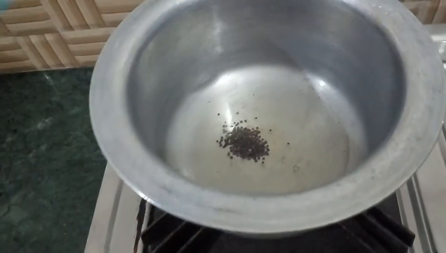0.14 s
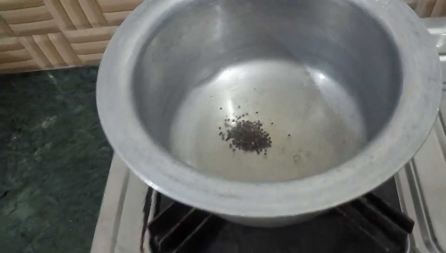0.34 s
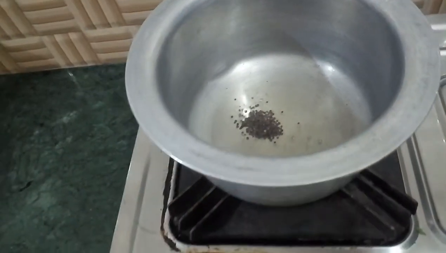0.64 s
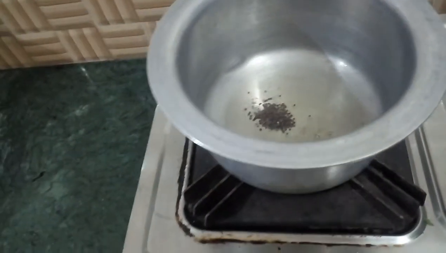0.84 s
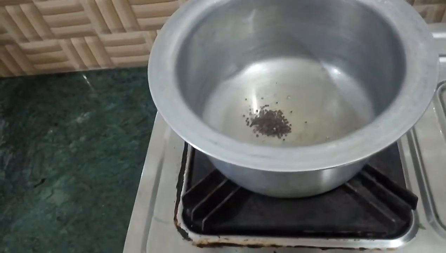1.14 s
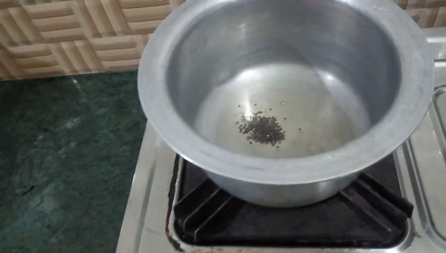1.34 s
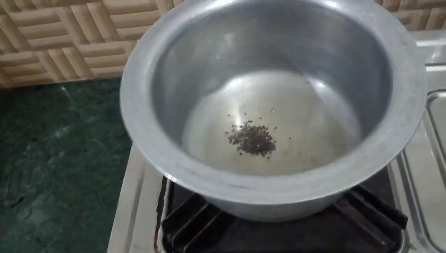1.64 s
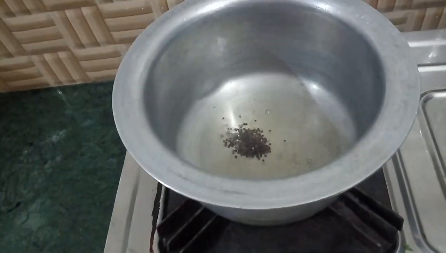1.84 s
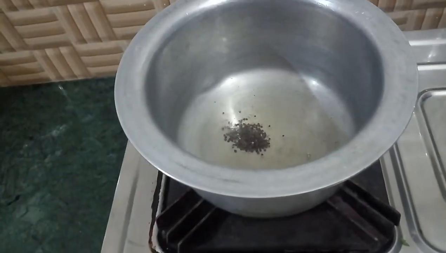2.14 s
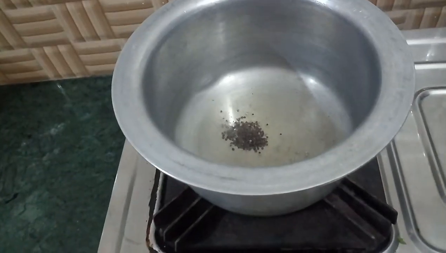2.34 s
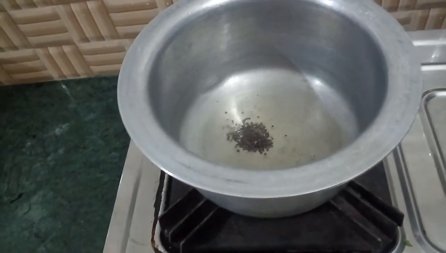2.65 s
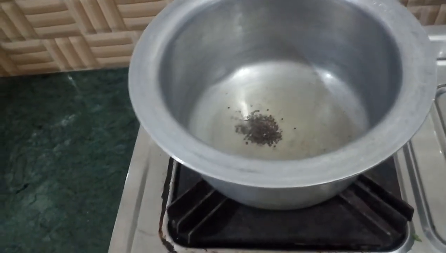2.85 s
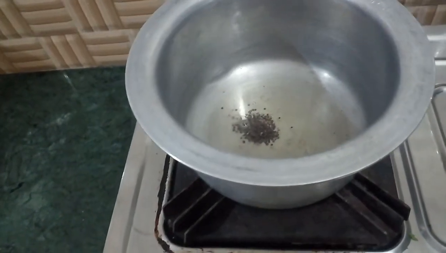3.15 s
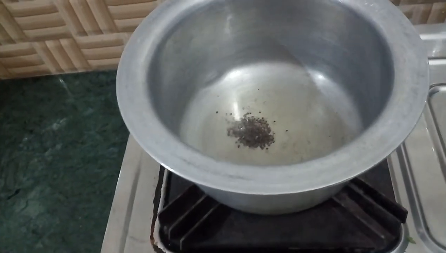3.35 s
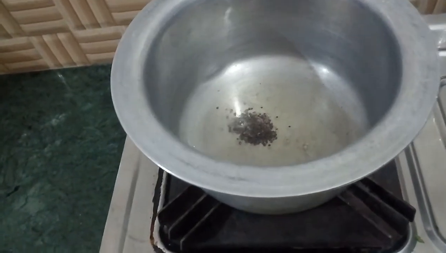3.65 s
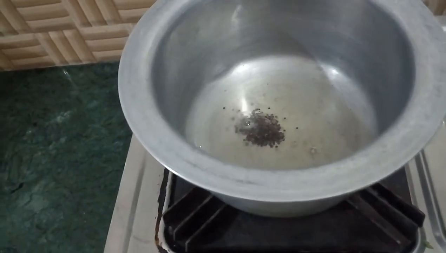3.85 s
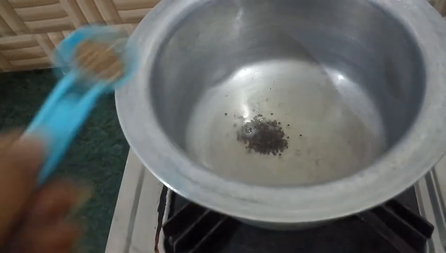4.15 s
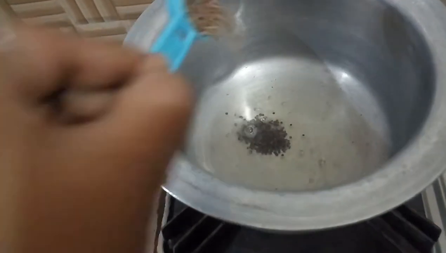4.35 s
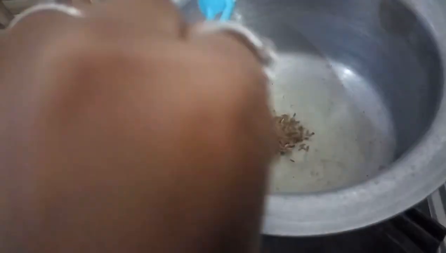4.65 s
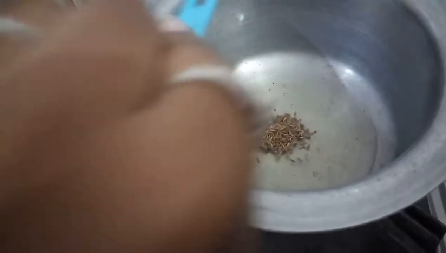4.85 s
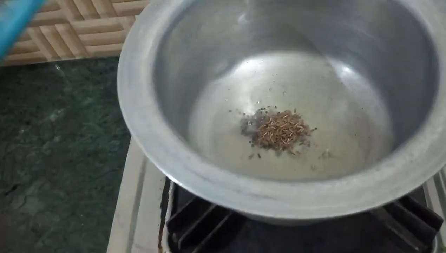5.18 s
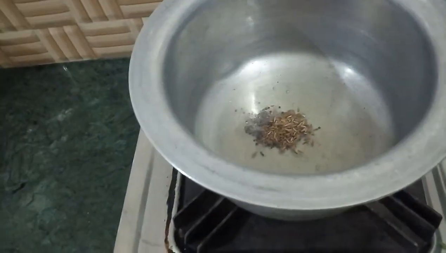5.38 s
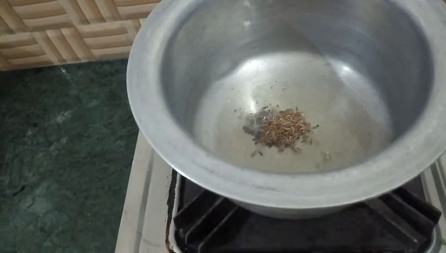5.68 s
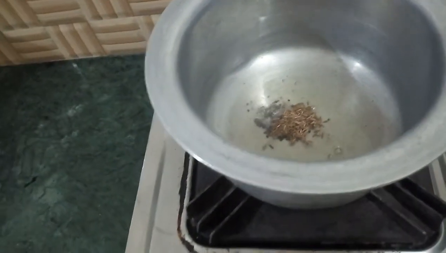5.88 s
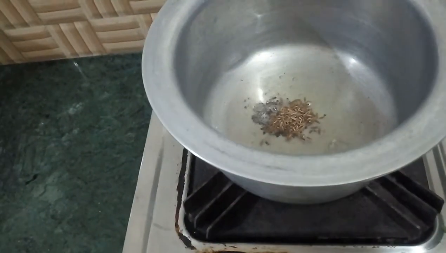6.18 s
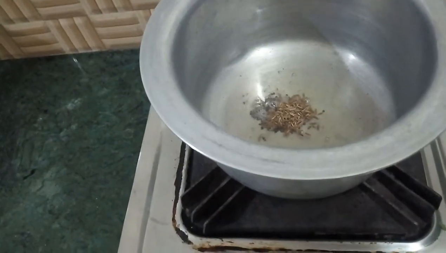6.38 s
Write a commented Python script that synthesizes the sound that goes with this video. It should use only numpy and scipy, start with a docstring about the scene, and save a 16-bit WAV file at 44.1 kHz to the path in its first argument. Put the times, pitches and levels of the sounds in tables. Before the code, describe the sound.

Seeds frying in hot oil crackle with dense, pitched little pops and a fine fizz inside a ringing metal pot, over a quiet gas burner murmur.

```python
"""Mustard and cumin seeds fry in hot oil in an aluminium pot on a gas ring, heard from just above the rim.
At first short pitched pops of bursting steam bubbles come thick and fast over a fizz of tiny ones.
They thin out after a second, crowd in again past the middle as the fizz peaks, then thin out to the end.
Now and then a husk snaps: a single click. Echoes and decaying tones ring the pot and a small hard kitchen.
Shaped noise makes the steady burner murmur underneath and two soft bumps of the hand."""
import sys
import numpy as np
from scipy import signal
from scipy.fft import rfft, irfft
from scipy.io import wavfile

SR = 44100
rng = np.random.default_rng(int(sys.argv[2]) if len(sys.argv) > 2 else 0)


def bounce(signal):
    """Save signal as a 16-bit WAV file at the path given by the first command-line argument."""
    frames = np.transpose(np.atleast_2d(signal))
    limited = np.clip(frames, -1, 1)
    pcm = np.round(limited * 32767).astype(np.int16)
    wavfile.write(sys.argv[1], SR, pcm)


N = 287443  # length in samples

# The loudest steam bubbles bursting. Each row: start in seconds, pitch in Hz, strength in dB.
LOUD_POPS = [(0.028, 3560, -7), (0.141, 1840, -7), (0.166, 5980, -5), (0.18, 3230, -7), (0.27, 2620, -5),
             (0.285, 2790, -5), (0.362, 3370, -3), (0.428, 1750, -7), (0.566, 3450, -1), (0.628, 2640, -9),
             (0.647, 3210, -2), (0.742, 4460, -7), (0.766, 3300, -2), (0.832, 2470, -4), (0.984, 3260, -4),
             (1.009, 2580, -6), (1.108, 2600, -5), (1.134, 4800, -7), (1.258, 2570, -9), (1.316, 2650, -7),
             (1.448, 3350, -12), (1.48, 1960, -9), (1.527, 2530, -13), (1.64, 2650, -9), (1.699, 2540, -2),
             (1.798, 4200, -7), (1.863, 2560, -2), (1.998, 2550, -11), (2.02, 2570, -11), (2.099, 1760, -4),
             (2.224, 4610, -8), (2.318, 3320, -9), (2.397, 2570, -4), (2.411, 3310, -9), (2.476, 3300, -5),
             (2.54, 3130, -9), (2.586, 3530, -8), (2.597, 1640, -3), (2.715, 2420, -8), (2.75, 4040, -7),
             (2.88, 2630, -8), (3.021, 3200, -7), (3.059, 2490, -9), (3.197, 2370, -7), (3.316, 1800, -5),
             (3.337, 2580, -5), (3.44, 3200, -3), (3.503, 3950, -4), (3.574, 2480, -2), (3.645, 4020, -4),
             (3.706, 3590, -7), (3.757, 4490, -7), (3.819, 2430, -5), (3.861, 3270, -3), (3.921, 3100, -7),
             (3.975, 2420, -2), (4.056, 3320, -4), (4.105, 5950, -8), (4.155, 3250, -4), (4.178, 3990, -4),
             (4.275, 4060, -5), (4.32, 1820, -8), (4.339, 4030, -5), (4.354, 3730, -6), (4.365, 3300, -4),
             (4.413, 4110, -3), (4.42, 3990, -6), (4.506, 4220, -7), (4.535, 4030, -5), (4.567, 4140, -5),
             (4.663, 4400, -7), (4.76, 2440, -3), (4.787, 2590, -6), (4.871, 3390, -3), (5.046, 2410, -3),
             (5.088, 3250, -5), (5.202, 2250, -5), (5.349, 2570, -3), (5.429, 1590, -9), (5.447, 2550, -7),
             (5.59, 4700, -11), (5.615, 4560, -10), (5.74, 1800, -10), (5.779, 2450, -6),
             (5.966, 2580, -10), (6.009, 3100, -7), (6.076, 4090, -6), (6.15, 1750, -3), (6.247, 2420, -11),
             (6.39, 2540, -5)]
# Colour of a burst as it leaves the pot. Each row: frequency in Hz, relative level in dB.
BURST_COLOUR = [(60, -50), (300, -28), (500, -34), (680, -1), (980, -34.5), (1550, 4), (2100, -2.5),
                (2500, 9.5), (3300, 3.5), (5000, -10.5), (6200, -8), (8000, -25.5), (11000, -28.5),
                (16000, -39.5)]
# Pitches that the pot favours in a pop, in Hz.
FAVOURED_HZ = [2508, 3412, 4153, 4420, 5694]


def undb(db):
    """Turn decibels into gain."""
    return 10 ** (np.asarray(db) / 20)


def unit(x):
    """Scale to an rms (average strength) of 1."""
    return x / np.sqrt(np.mean(x ** 2))


def add(track, s, sound):
    """Mix a sound into a track at a time in seconds."""
    i = int(np.clip(s * SR, 0, N - 1))
    track[i:i + len(sound)] += sound[:N - i]


def convolve(x, impulse):
    """Pass a sound through an impulse response."""
    return signal.fftconvolve(x, impulse)[:N]


def response(points, size=2048):
    """Make an impulse response that starts at once and has the colour given by (Hz, dB) points."""
    hz, db = np.transpose(points)
    bins = np.maximum(np.fft.rfftfreq(size, 1 / SR), 1)
    gain = undb(np.interp(np.log(bins), np.log(hz), db))
    # folding the cepstrum packs the energy as early as possible
    cepstrum = irfft(np.log(gain))
    cepstrum[1:size // 2] *= 2
    cepstrum[size // 2 + 1:] = 0
    return irfft(np.exp(rfft(cepstrum)))


def high_pass(x, hz):
    """Take away the bass below a frequency."""
    return signal.sosfilt(signal.butter(2, hz, "high", fs=SR, output="sos"), x)


def leak(x, settle_s):
    """Let every kick die away exponentially."""
    return signal.lfilter([1], [1, -np.exp(-1 / (settle_s * SR))], x)


def diffuse(x, t60_s, first_s, count=24):
    """A dense tail of echoes, whose pattern changes slice by slice as the hand-held microphone drifts."""
    t = np.arange(SR // 2) / SR
    hop = N // count + 1
    out = np.zeros(N)
    for start in range(0, N, hop):
        tail = rng.standard_normal(len(t)) * undb(-60 * t / t60_s) * (t > first_s)
        echoes = signal.fftconvolve(x[start:start + hop], tail / np.linalg.norm(tail))
        add(out, start / SR, echoes)
    return out


def burner():
    """The gas flame's low steady murmur: noise of a fixed colour."""
    # Each row: frequency in Hz, relative level in dB per Hz.
    flame_colour = [(20, -14.5), (38, -3), (50, 3), (65, -14), (105, -2), (220, -14), (380, -5.5),
                    (700, -11), (2000, 5.5), (8000, -26), (16000, -49)]
    murmur = convolve(rng.standard_normal(N), response(flame_colour, size=8192))
    return undb(-52.5) * unit(murmur)


def handling(width_s=0.055, low_hz=90, high_hz=220):
    """Low noise swells dully as the grip of the hand holding the microphone shifts."""
    # Each row: middle of the bump in seconds, level in dB.
    bumps = [(2.0, -59.5), (4.3, -59)]
    t = np.arange(N) / SR
    band = signal.butter(2, [low_hz, high_hz], "band", fs=SR, output="sos")
    rumble = signal.sosfilt(band, rng.standard_normal(N))
    swells = sum(undb(db) * np.exp(-((t - s) / width_s) ** 2) for s, db in bumps)
    return unit(rumble) * swells


def bubble(hz, length_s, rise, glide, shape):
    """A steam cavity rings up, drifts in pitch and dies away, with the energy of a unit sine length_s long."""
    age = np.arange(int(4 * length_s * SR) + 8) / (length_s * SR)  # in lengths
    ring_up = 1 - np.exp(-(age / rise) ** 2)
    die_away = np.exp(-(age / 1.3) ** shape)
    fade_out = np.minimum(abs(4 - age), 1)
    envelope = ring_up * die_away * fade_out
    envelope *= np.sqrt(length_s * SR / np.sum(envelope ** 2))
    pitch_hz = hz * (1 + glide * np.tanh(age - .5))
    return envelope * np.sin(2 * np.pi * np.cumsum(pitch_hz) / SR)


def small_bubbles(per_s=160, spread_db=5, low_hz=2600, high_hz=7200, cycles=3):
    """A swarm of small pitched bubbles of all sizes, bursting at random."""
    track = np.zeros(N)
    for when, width, strength, damping in rng.random((int(per_s * N / SR), 4)):
        hz = low_hz * (high_hz / low_hz) ** width
        gain = undb(-spread_db * np.log(strength + 0.025))
        length_s = cycles * np.exp(2 * damping - 1) / hz
        add(track, when * N / SR, gain * bubble(hz, length_s, rise=0.15, glide=0, shape=0.35))
    return unit(track)


def spits(per_s=300, spread_db=14.0, decay_s=0.0013):
    """Droplets of moisture flash to steam, each a tiny unpitched crack of noise."""
    when, strength = rng.random((int(per_s * N / SR), 2)).T
    gains = undb(-spread_db * np.log(strength + 0.02))
    kicks = np.bincount((when * N).astype(int), gains, N)
    return unit(leak(kicks, decay_s) * rng.standard_normal(N))


def stirred(settle_s, db_per_octave, big_hz=2000):
    """How far the loud pops stir the oil: each kicks it by its strength and size, then it settles."""
    s, hz, db = np.transpose(LOUD_POPS)
    power = undb(db + db_per_octave * np.log2(hz / big_hz)) ** 2
    kicks = np.bincount((s * SR).astype(int), power, N)
    return np.sqrt(leak(kicks, settle_s))


def fizz_db(s):
    """How hard the oil fizzes at a time, before the flares after loud pops."""
    # Each row: time in seconds, relative level in dB.
    fizz_levels = [(0.0, -26), (0.4, -33), (1.1, -30), (1.37, -40), (1.45, -32), (2.15, -33), (2.2, -28),
                   (2.87, -29), (2.95, -37), (3.02, -28), (3.87, -26), (3.95, -33), (4.42, -19), (4.9, -33),
                   (4.92, -40), (5.15, -26), (5.37, -40), (5.6, -26), (5.72, -42), (5.8, -32), (5.87, -40),
                   (6.07, -28), (6.17, -35), (6.52, -35)]
    return np.interp(s, *np.transpose(fizz_levels))


def fizz(bubbles_db=1.5, spits_db=-3, hiss_db=-6, calm_db=-1.0, stir_db=1):
    """Bubbles, spits and finer hiss surge as the seeds give up their water, and flare after loud pops."""
    # Each row: frequency in Hz, relative level in dB.
    fizz_colour = [(150, -26), (450, -34.5), (680, -4), (1000, -23), (1550, 1.5), (2150, -12), (2480, 10.5),
                   (2900, -11), (3280, 1), (5100, -4), (6400, -2.5), (7900, -21), (9300, -13), (12500, -35),
                   (15300, -33)]
    swarm = undb(bubbles_db) * small_bubbles()
    swarm += undb(spits_db) * spits()
    swarm += undb(hiss_db) * spits(per_s=2000, spread_db=10.0, decay_s=0.0012)
    stirring = stirred(settle_s=0.013, db_per_octave=-19.0)
    flare = np.hypot(undb(calm_db), undb(stir_db) * stirring)
    surge = undb(fizz_db(np.arange(N) / SR))
    return convolve(swarm, response(fizz_colour)) * surge * flare


def gurgle(gain_db=-38):
    """The oil burbles low for a moment after a loud pop, most of all where a big bubble has burst."""
    # Each row: frequency in Hz, relative level in dB.
    gurgle_colour = [(100, -34), (250, -19.5), (380, -14), (690, 1), (1000, -11.5), (1600, -3),
                     (2400, -4.5), (5000, -34.5)]
    burps = spits(per_s=120, spread_db=6.5, decay_s=.0012)
    burble = unit(convolve(burps, response(gurgle_colour)))
    return undb(gain_db) * burble * stirred(settle_s=0.066, db_per_octave=-17)


def snaps():
    """Dry husks split, each with a single sharp click."""
    # Each row: start in seconds, peak in dB before the pot and kitchen.
    snap_times = [(0.1731, -8.5), (0.6302, -18), (0.649, -31), (1.0306, -5.5), (1.5286, -9), (3.8093, -9),
                  (4.182, -14), (5.214, -13), (6.395, -11.5)]
    # Each row: frequency in Hz, relative level in dB.
    snap_colour = [(200, -39), (1200, -23), (3000, 4.5), (6000, 4.5), (8000, -7), (11000, -6), (16000, -16)]
    track, click = np.zeros(N), response(snap_colour)
    for s, db in snap_times:
        add(track, s, undb(db) * click / abs(click).max())
    return track


def lesser_pops(count=80, base_db=-13, usual_fizz_db=-31, follow=0.4, spread_db=2, detune=0.025):
    """Smaller bubbles burst at random, harder while the oil fizzes hard; rows like LOUD_POPS."""
    rows = []
    for k, (when, which, tuning, strength) in enumerate(rng.random((count, 4))):
        s = (k + when) / count * N / SR
        hz = FAVOURED_HZ[int(which * len(FAVOURED_HZ))] * (1 + detune * (2 * tuning - 1))
        surge_db = follow * (fizz_db(s) - usual_fizz_db)
        rows.append((s, hz, base_db + surge_db + spread_db * (2 * strength - 1)))
    return rows


def daughter_pops(within_s=0.14, below_db=-12, smaller=1.12, detune=0.22, count=3, big_below_hz=2300):
    """A big low bubble breaks into a few, mostly smaller, that burst soon after; rows like LOUD_POPS."""
    rows = []
    for s, hz, db in LOUD_POPS:
        if hz < big_below_hz:
            for k, (when, tuning) in enumerate(rng.random((count, 2))):
                later_s = s + within_s * (k + when) / count
                daughter_hz = hz * smaller * (1 + detune * (2 * tuning - 1))
                rows.append((later_s, daughter_hz, db + below_db))
    return rows


def splutter(bursts, after_s=0.038, below_db=-15, big_hz=2000, db_per_octave=-9, fade_db_per_s=-45,
             tear_s=0.0042, scatter_db=10, count=7):
    """After a pop the shaken oil film tears again and again; big low bubbles leave the most spray."""
    track = np.zeros(N)
    t = np.arange(SR // 100) / SR
    for s, hz, db in bursts:
        spray_db = db + below_db + db_per_octave * np.log2(hz / big_hz)
        # each tear is coloured by the size of its parent bubble
        band = signal.butter(1, [hz / 3, hz * 1.2], "band", fs=SR)
        for wait, strength in rng.random((count, 2)):
            delay_s = .005 - after_s * np.log(wait + 1e-9)
            gain = undb(spray_db + fade_db_per_s * delay_s + scatter_db * (strength - 1.5))
            tear = signal.lfilter(*band, rng.standard_normal(len(t)))
            add(track, s + delay_s, gain * unit(tear) * np.exp(-t / tear_s))
    return convolve(track, response(BURST_COLOUR))


def side_rings(bursts, below_db=-9, db_per_octave=-10, scatter_db=3, detune=0.066):
    """A pop also sets the pot's other favoured pitches ringing for a moment, the nearest ones most."""
    track = np.zeros(N)
    for s, hz, db in bursts:
        for ring_hz in FAVOURED_HZ:
            strength, tuning, push = 2 * rng.random(3) - 1
            octaves = abs(np.log2(ring_hz / hz))
            if octaves > .12:  # leave out the pop's own pitch
                ring = bubble(ring_hz * (1 + detune * tuning), length_s=.0013, rise=.35, glide=0, shape=1)
                gain = undb(db + below_db + db_per_octave * octaves + scatter_db * strength)
                add(track, s, np.sign(push) * gain * ring)
    return track


def pops(bursts, tone_db=-2.0, splash_db=-10, big_hz=2500, db_per_octave=-1, rise=0.29, splash_s=0.005,
         glide_spread=0.032, low_cut_hz=700, length_spread=0.39):
    """Bubbles ring at a pitch, with a brief splash as the oil film tears, fuller for big ones."""
    # How long a bubble usually rings. Each row: pitch in Hz, length in seconds.
    ring_lengths = [(1750, 0.0023), (2500, 0.0029), (3300, 0.0029), (4000, 0.0014), (6000, 0.00087)]
    tones, splashes = np.zeros(N), np.zeros(N)
    t = np.arange(SR // 50) / SR
    for s, hz, db in bursts:
        glide, sudden = glide_spread * rng.standard_normal(), .5 + rng.random()
        usual_s = np.interp(hz, *np.transpose(ring_lengths))
        length_s = usual_s * np.exp(length_spread * (2 * rng.random() - 1))
        tone = bubble(hz, length_s, rise * sudden, glide, shape=1.15)
        add(tones, s, undb(db + tone_db) * tone)
        splash = high_pass(np.exp(-t / splash_s) * rng.standard_normal(len(t)), hz / 4)
        size_db = db_per_octave * np.log2(hz / big_hz)
        add(splashes, s, undb(db + splash_db + size_db) * splash)
    # so small a source radiates almost no bass
    return high_pass(tones, low_cut_hz) + convolve(splashes, response(BURST_COLOUR))


def pot(x, metal_db=-58.5, air_db=-7.0, air_t60_s=0.12, first_s=0.0026):
    """The air in the pot reverberates in a few bands while the aluminium rings thinly."""
    # Ringing of the metal. Each row: frequency in Hz, relative level in dB, time to fall 60 dB in seconds.
    metal_modes = [(691.6, -8.5, 0.16), (789.5, 1.5, 0.38), (1364, -4.5, 0.6), (1425, 2, 0.25),
                   (1580, 5, 0.14), (1873, 1, 0.23), (2439, -6.5, 0.34), (3253, -6, 0.1), (3950, -21, 0.11),
                   (4470, -20, 0.22), (5460, -5, 0.15)]
    # Crowded resonances of the air. Each row: frequency in Hz, width in Hz, relative level in dB.
    air_bands = [(666, 72, -11), (1484, 180, 7), (1882, 115, 9.5), (2485, 340, 2.5), (3270, 79, 6),
                 (4280, 1200, -3), (5900, 4200, 0.5)]
    t = np.arange(SR // 2) / SR
    metal = sum(undb(metal_db + db - 60 * t / t60) * np.cos(2 * np.pi * hz * t)
                for hz, db, t60 in metal_modes)
    bounces = diffuse(x, air_t60_s, first_s)
    air = sum(undb(air_db + db) * signal.lfilter(*signal.iirpeak(hz, hz / width, fs=SR), bounces)
              for hz, width, db in air_bands)
    return x + convolve(x, metal) + air


def kitchen(x, wet_db=-17, t60_s=0.6, first_s=.006):
    """Tiles and stone return a short diffuse tail."""
    return x + undb(wet_db) * diffuse(x, t60_s, first_s)


def scene():
    """Everything that fries sounds through the pot and the kitchen; burner and bumps are added plain."""
    bursts = list(LOUD_POPS) + lesser_pops() + daughter_pops()
    frying = pops(bursts) + side_rings(bursts) + splutter(bursts) + fizz() + gurgle() + snaps()
    return (kitchen(pot(frying)) + burner() + handling())[None]


def record(dry, top_hz=15500):
    """The microphone rounds only the very tallest peaks and cuts the top."""
    rounded = dry / (1 + dry ** 8) ** (1 / 8)
    return signal.sosfilt(signal.ellip(8, .2, 70, top_hz, fs=SR, output="sos"), rounded)


dry = scene()
out = record(dry)
bounce(out)
```